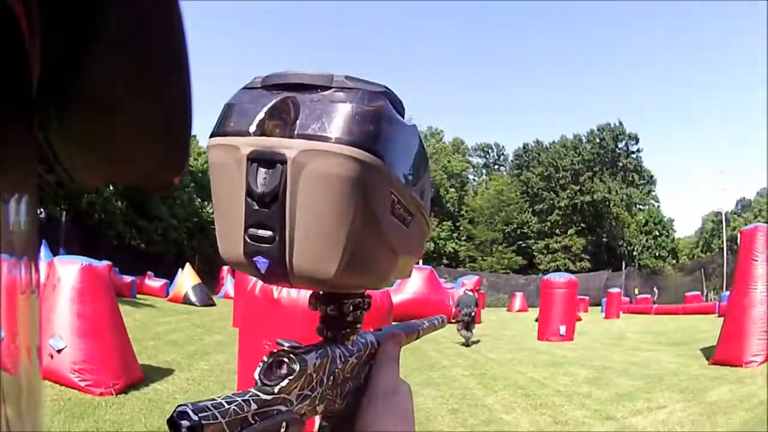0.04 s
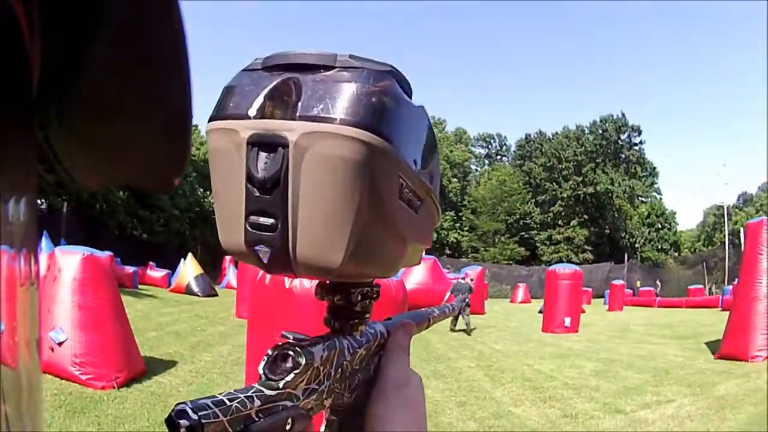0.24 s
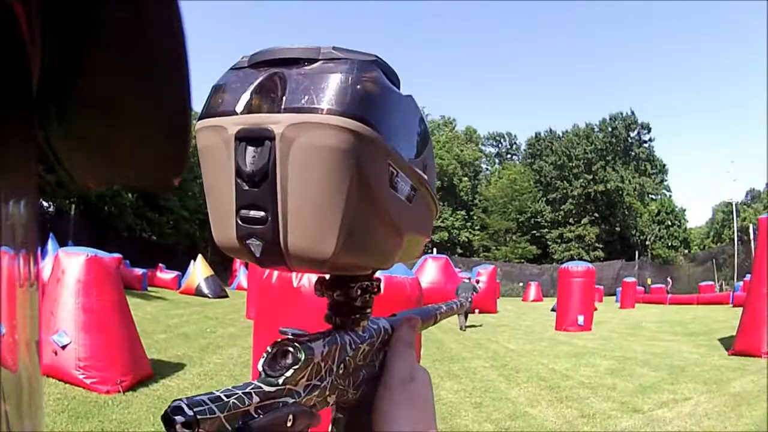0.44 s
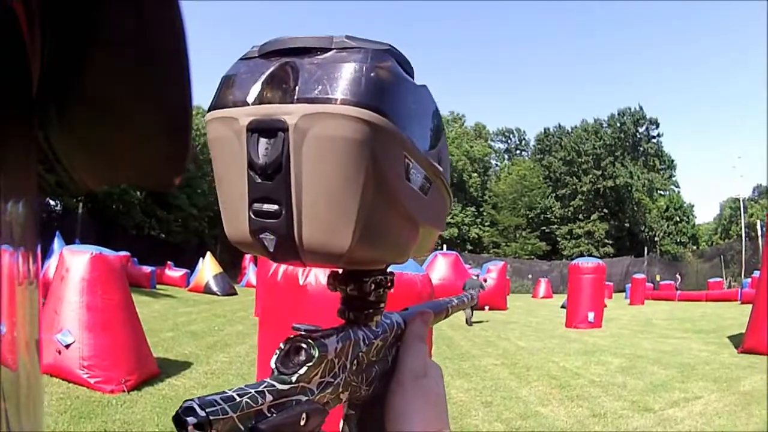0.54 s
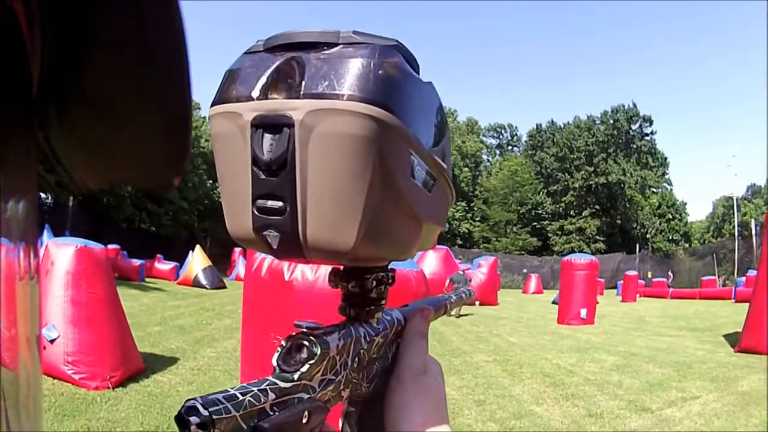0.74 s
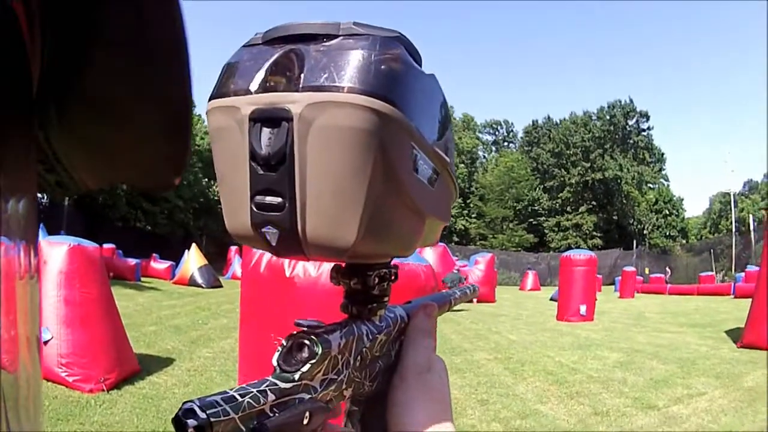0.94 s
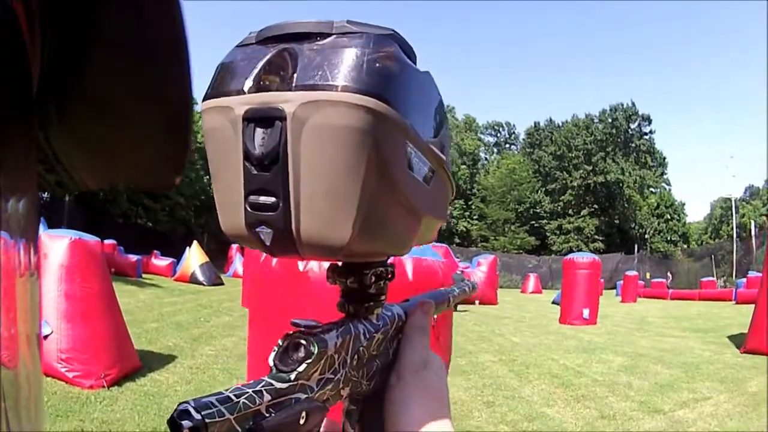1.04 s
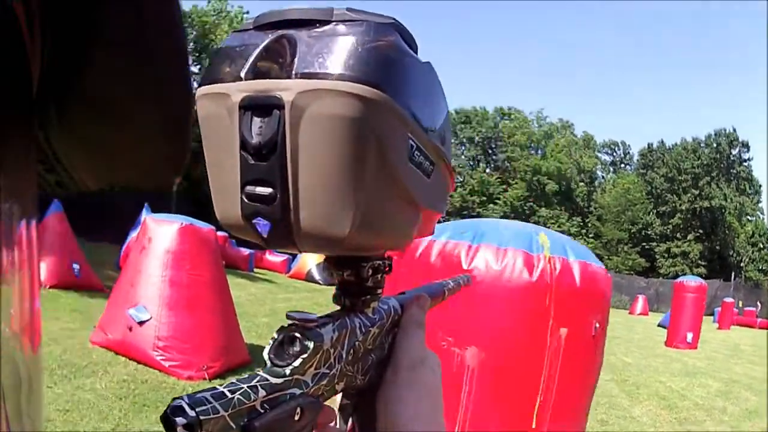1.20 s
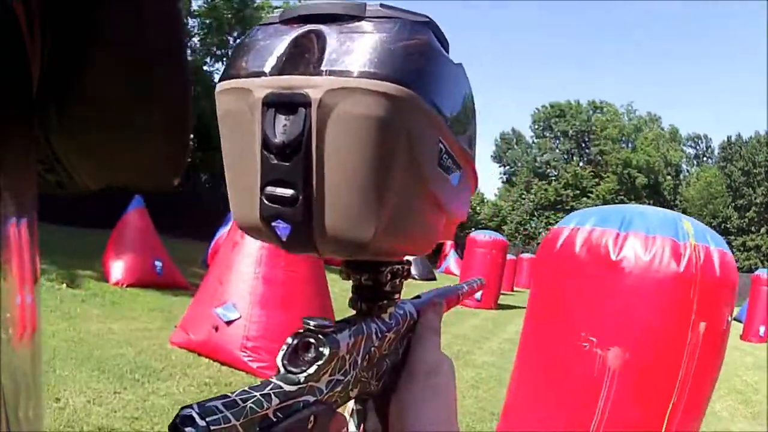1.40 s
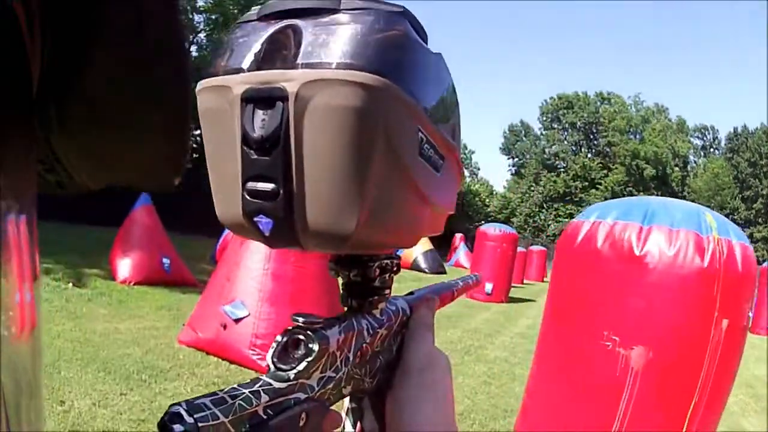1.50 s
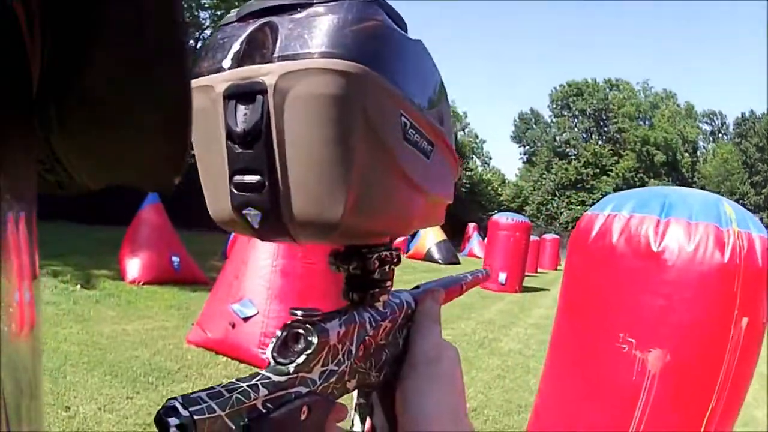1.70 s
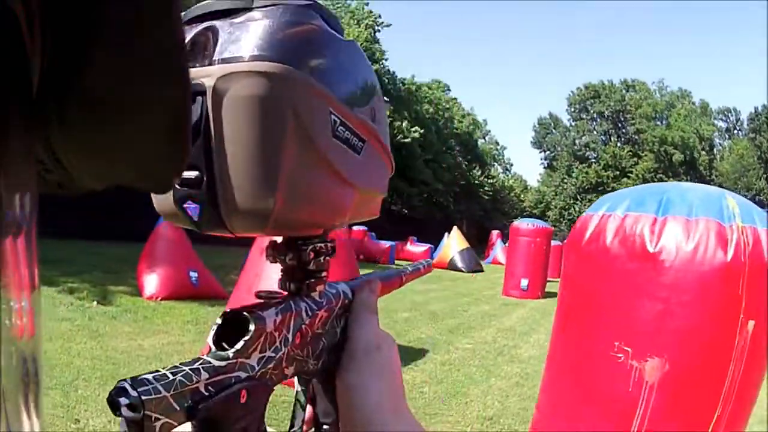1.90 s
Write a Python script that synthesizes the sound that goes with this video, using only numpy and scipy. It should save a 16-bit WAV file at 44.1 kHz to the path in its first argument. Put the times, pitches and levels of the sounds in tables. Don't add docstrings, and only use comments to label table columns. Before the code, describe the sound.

A paintball marker fires ten fast, even shots right beside a small camera microphone, loud and clipped, after a few neighbouring shots; then a ball bursts close by and distant pops and dull bunker thuds continue outdoors.

```python
import sys
import numpy as np
from scipy import signal
from scipy.fft import rfft, irfft, next_fast_len
from scipy.io import wavfile
from scipy.ndimage import uniform_filter1d

SR = 44100
rng = np.random.default_rng(int(sys.argv[2]) if len(sys.argv) > 2 else 0)


def persist_wave(psi):
    counts = np.round(np.clip(psi, -1, 1) * 32767).astype(np.int16)
    wavfile.write(sys.argv[1], SR, np.atleast_2d(counts).T)


def linear_from_db(decibels):
    return 10 ** (np.asarray(decibels, float) / 20)


N = 85995


def unit(x):
    return x / np.sqrt(np.mean(x ** 2) + 1e-20)


def filtered(x, response):
    size = next_fast_len(N + SR // 2)
    hz = np.fft.rfftfreq(size, 1 / SR)
    return irfft(rfft(x, size) * response(hz), size)[:N]


def resonant(x, peaks):
    def response(f):
        total = 0
        for k, (centre_hz, width_hz, level_db) in enumerate(peaks):
            damping = 1j * f * width_hz
            total = total + (-1) ** k * linear_from_db(level_db) * damping / (centre_hz ** 2 - f * f + damping)
        return total / np.sqrt(np.mean(np.abs(total) ** 2))
    return filtered(x, response)


def dulled(x, edge_hz):
    return filtered(x, lambda f: 1 / (1 - (f / edge_hz) ** 2 + 1.3j * f / edge_hz))


def puffs(events, parts, peaks):
    scatter_s, scatter_db = 0.00016, 1.14
    power, t = np.zeros(N), np.arange(N) / SR
    chance = rng.standard_normal((len(events), len(parts), 2))
    for (start_s, event_db), row in zip(events, chance):
        for (delay_s, part_db, rise_s, t60_s), (late, loud) in zip(parts, row):
            i = max(round((start_s + delay_s + scatter_s * late) * SR), 0)
            u = t[:min(N - i, SR // 4)]
            decay = linear_from_db(event_db + part_db + scatter_db * loud - 60 * u / t60_s)
            power[i:i + len(u)] += (decay * (1 - np.exp(-u / rise_s))) ** 2
    return resonant(np.sqrt(power) * rng.standard_normal(N), peaks)


def rings(rows, rise_s):
    out, t = np.zeros(N + SR), np.arange(SR // 4) / SR
    for start_s, pitch_hz, level_db, t60_s in rows:
        envelope = linear_from_db(level_db - 60 * t / t60_s) * (1 - np.exp(-t / rise_s))
        out[round(start_s * SR):][:len(t)] += envelope * np.sin(2 * np.pi * pitch_hz * t)
    return out[:N]


def struck(events, modes, rise_s, spread, spread_db):
    vary = rng.standard_normal((len(events), len(modes), 2))
    rows = []
    for (start_s, event_db), row in zip(events, vary):
        for (delay_s, pitch_hz, level_db, t60_s), (a, b) in zip(modes, row):
            level = event_db + level_db + spread_db * b
            rows.append((start_s + delay_s, pitch_hz * (1 + spread * a), level, t60_s))
    return rings(rows, rise_s)


def patchy_noise():
    spectrum = signal.stft(rng.standard_normal(N), nperseg=256)[2]
    patches = uniform_filter1d(rng.standard_normal(spectrum.shape), 5, 0)
    patches = unit(uniform_filter1d(patches, 6, 1))
    return signal.istft(spectrum * linear_from_db(4 * patches), nperseg=256)[1][:N]


# start_s, level_db
FIREFIGHT_LEVEL = [(0.0, -42.5), (0.292, -47.5), (0.4, -40), (0.798, -39), (1.014, -37.5), (1.346, -37.5),
                   (1.548, -41.5), (1.672, -45.5), (1.95, -45.5)]
# pitch_hz, level_db (per Hz)
FIREFIGHT_LOW = [(15, -46), (25, -7.5), (276, -11.5), (830, -9.5), (909, -13), (2000, -11), (2600, -37),
                 (4400, -120)]
# pitch_hz, width_hz, level_db
FIREFIGHT_HIGH = [(2534, 380, 2.5), (4200, 1300, -19), (6000, 1400, -36), (9200, 1040, -17)]


def far_firefight():
    times, busy_db = np.transpose(FIREFIGHT_LEVEL)
    corner_hz, corner_db = np.transpose(FIREFIGHT_LOW)

    def distance(hz):
        level_db = np.interp(np.log(hz + 1), np.log(corner_hz + 1), corner_db)
        return linear_from_db(level_db) / (1 + (hz / 2300) ** 6)
    low = unit(filtered(patchy_noise(), distance))
    high = unit(resonant(patchy_noise(), FIREFIGHT_HIGH))
    busy = linear_from_db(np.interp(np.arange(N) / SR, times, busy_db))
    return busy * (linear_from_db(-2) * low + linear_from_db(-6.5) * high)


def echoes(x):
    level_db, rise_s, t60_s, edge_hz = -24.5, 0.047, 0.52, 4550
    t = np.arange(SR // 2) / SR
    tail = rng.standard_normal(len(t)) * linear_from_db(-60 * t / t60_s) * (1 - np.exp(-t / rise_s))
    wet = signal.fftconvolve(x, tail / np.linalg.norm(tail))[:N]
    return linear_from_db(level_db) * filtered(wet, lambda hz: 1 / (1 + 1j * hz / edge_hz))


# start_s, level_db
FAR_POPS = [(.1425, -29.5), (.918, -26), (1.224, -26), (1.251, -27), (1.268, -30), (1.696, -30),
            (1.33, -15), (1.4675, -19), (1.6093, -18.5), (1.7447, -15.5), (1.8868, -17)]
# pitch_hz, level_db, t60_s
POP_TONES = [
    (2250, 4.5, 0.0065),
    (1850, -8, .005),
    (5340, -17, 0.0046),
]
# delay_s, level_db, rise_s, t60_s
POP_AIR = [
    (0, -14, 0.00042, 0.004),
    (.003, -27, 0.0025, 0.098),
]
# pitch_hz, width_hz, level_db
POP_COLOUR = [(1800, 800, -8), (2600, 710, 6)]


def far_pops():
    vary = rng.standard_normal((len(FAR_POPS), len(POP_TONES)))
    rows = []
    for (start_s, event_db), row in zip(FAR_POPS, vary):
        for (pitch_hz, level_db, t60_s), a in zip(POP_TONES, row):
            rows.append((start_s, pitch_hz * (1 + 0.032 * a), event_db + level_db, t60_s))
    return rings(rows, rise_s=0.00046) + puffs(FAR_POPS, POP_AIR, POP_COLOUR)


# start_s, level_db
RATTLES = [(.004, -50), (.066, -45), (.145, -45), (.489, -39), (1.333, -26.5), (1.346, -36), (1.355, -40),
           (1.539, -55), (1.653, -50), (1.7, -44), (1.856, -48), (1.912, -47)]
# pitch_hz, width_hz, level_db
LOADER_SHELL = [(4300, 800, 0), (5840, 740, 3), (8200, 1700, -4)]


def loader_rattles():
    knock = [(0.00073, 0, 0.0004, 0.013)]  # delay_s, level_db, rise_s, t60_s
    return puffs(RATTLES, knock, LOADER_SHELL)


# start_s, drum pitch_hz, drum
# level_db, slap level_db
BUNKER_HITS = [(.001, 181, -35.5, -45), (.169, 209, -35.5, -43), (1.3, 201, -38.5, -52),
               (1.821, 236, -33, -44), (1.43, 600, -33, -34), (.8945, 329, -20, -37),
               (1.3671, 301, -19, -36), (1.378, 284, -24, -30), (1.5176, 317, -20, -21.5),
               (1.53, 300, -30, -40), (1.6845, 200, -30, -55), (1.582, 258, -36, -41),
               (1.6784, 237, -24, -55), (1.93, 97.4, -30.5, -42)]
# pitch ratio, level_db, t60_s
SKIN_MODES = [(1.01, 2, .034), (1.61, -4.5, .025), (2.6, -5, .022), (.62, -8, .04), (.4, -16, .06)]
# delay_s, level_db, rise_s, t60_s
SLAP_AIR = [
    (0, 8.5, 0.00028, 0.0086),
    (.002, -12, 0.0034, 0.19),
]
# pitch_hz, width_hz, level_db
SLAP_COLOUR = [(810, 440, 8), (2600, 610, 1.5)]


def bunker_hits():
    drums = []
    for start_s, pitch_hz, drum_db, _ in BUNKER_HITS:
        for ratio, level_db, t60_s in SKIN_MODES:
            drums.append((start_s, pitch_hz * ratio, drum_db + level_db, t60_s))
    slap_events = [(start_s, slap_db) for start_s, _, _, slap_db in BUNKER_HITS]
    slaps = puffs(slap_events, SLAP_AIR, SLAP_COLOUR)
    return rings(drums, rise_s=0.00031) + dulled(slaps, 3400)


# delay_s, pitch_hz, level_db, t60_s
SPLAT_RING = [(.002, 420, -11, .026), (.0025, 810, -6, .03), (.0025, 1030, -6, .022),
              (.0025, 1410, -6, .026), (0, 2240, -4, .006), (0, 2580, -4, .009)]
# delay_s, level_db, rise_s, t60_s
SPLAT_AIR = [
    (0, 4.5, 0.00034, .008),
    (.003, 1, 0.0005, 0.013),
    (.003, -15.5, .003, .11),
]
# pitch_hz, width_hz, level_db
SPLAT_COLOUR = [(1160, 1100, 2), (2600, 810, 2.5), (4100, 480, -10), (6400, 4000, -18.5),
                (13000, 5700, -22)]


def ball_burst():
    start_s, burst_db = 1.3155, -6.5
    rows = []
    for delay_s, pitch_hz, level_db, t60_s in SPLAT_RING:
        rows.append((start_s + delay_s, pitch_hz, burst_db + level_db, min(t60_s, .04)))
    return rings(rows, rise_s=0.00022) + puffs([(start_s, burst_db)], SPLAT_AIR, SPLAT_COLOUR)


# delay_s, level_db, rise_s, t60_s
MUZZLE_AIR = [
    (0.00049, -3.5, 0.00036, 0.015),
    (.0055, -5, 0.00041, 0.016),
    (0.0153, -14.5, 0.0024, 0.016),
    (0.004, -18, 0.0031, .1),
]
# delay_s, level_db, rise_s, t60_s
VENT_AIR = [
    (0, -17, 0.00088, 0.018),
    (.0038, -8, .0008, 0.012),
    (.007, -21, .002, .06),
    (.014, -22, .002, .03),
]
# pitch_hz, width_hz, level_db
VENT_COLOUR = [(5250, 730, 0.5), (7080, 840, -4), (8300, 1030, -6.5), (11900, 4000, -36)]
# delay_s, pitch_hz, level_db, t60_s
REPORT_RING = [
    (.0002, 1900, -3, .004),
    (.0038, 5250, -9, 0.0073),
    (.0055, 1700, -9, .012),
]


def other_marker(shots, muzzle):
    reports = [(start_s, report_db) for start_s, report_db, _ in shots]
    vents = [(start_s, vent_db) for start_s, _, vent_db in shots]
    air = puffs(reports, MUZZLE_AIR, muzzle) + puffs(vents, VENT_AIR, VENT_COLOUR)
    metal = struck(vents, REPORT_RING, .0003, .03, 1.5)
    return dulled(air - metal, 11000)


# start_s, report level_db, vent level_db
NEIGHBOUR_SHOTS = [(.0268, -14, -16.5), (.167, -16.5, -18), (.3308, -20, -16), (.3974, -16.5, -17)]
# pitch_hz, width_hz, level_db
NEIGHBOUR_BARREL = [(455, 200, -4.5), (1600, 660, -8.5), (2680, 370, 0)]
# start_s, report level_db, vent level_db
FLANK_SHOTS = [(1.0052, -16, -15.5), (1.1005, -13, -14), (1.2022, -15, -16), (1.6628, -19, -15),
               (1.8194, -19.5, -15.5), (1.9238, -20, -16)]
# pitch_hz, width_hz, level_db
FLANK_BARREL = [(460, 200, -4), (1700, 315, 0), (2500, 390, -1.5), (4270, 320, -10)]


def other_players():
    neighbour = other_marker(NEIGHBOUR_SHOTS, NEIGHBOUR_BARREL)
    return neighbour + other_marker(FLANK_SHOTS, FLANK_BARREL)


# start_s, level_db
TRIGGER_CLICKS = [(.2198, -19), (.3045, -26), (.3284, -19), (.4412, -16), (.5316, -13.5), (.6265, -30),
                  (.6565, -17), (.8305, -13.5), (1.197, -25)]
# delay_s, level_db, rise_s, t60_s
CLICK_PARTS = [
    (0, -8.5, .0001, 0.018),
    (.004, -18, .002, .025),
]
# pitch_hz, width_hz, level_db
SWITCH_COLOUR = [(2600, 390, 3.5), (4200, 630, -0.5), (7400, 2800, -8), (10900, 4000, -21)]


def trigger():
    return puffs(TRIGGER_CLICKS, CLICK_PARTS, SWITCH_COLOUR)


# start_s, level_db
SHOTS = [(.2408, 0), (.3496, 0), (.4629, 0), (.5629, 0), (.663, 0), (.7631, -0.5), (.8632, 0), (.9633, 0),
         (1.0636, 0), (1.1635, 0.5)]
# delay_s, level_db, rise_s, t60_s
SHOT_AIR = [
    (-.0118, -22, .0004, .008),
    (0, -5, .0002, .007),
    (.0012, -5, .0006, .012),
    (.0032, -9, .0005, .014),
    (.0057, -1.5, .0004, .013),
]
# pitch_hz, width_hz, level_db
BARREL = [(772, 480, -10), (2100, 300, -2), (2700, 500, -2), (3506, 400, -2), (4300, 364, -9),
          (5340, 490, -7), (7200, 1700, -11), (9230, 950, -8), (13000, 5600, -22)]
# delay_s, level_db, rise_s, t60_s
SHOT_HISS = [
    (-.0143, -25, .002, .02),
    (-.0035, -28, .001, .02),
    (.0118, -19, .001, .02),
    (.016, -25, .001, .028),
    (.001, -34, .004, .12),
]
# pitch_hz, width_hz, level_db
BODY = [(900, 900, -6), (2090, 400, -4), (2600, 400, 0), (3510, 600, -4), (5400, 1200, -8),
        (8800, 1200, -9)]
# delay_s, pitch_hz, level_db, t60_s
SHOT_RING = [(.0003, 3270, -6, .005), (.0011, 2320, 5, .0055), (.0046, 2082, -12, .012),
             (.0058, 2075, -5, .013), (.0058, 2620, -7, .013), (.0058, 3525, -1.5, .013),
             (.0058, 5290, -5, .012), (.0058, 6970, -11, .008), (0.0123, 2600, -22, .02)]
# delay_s, pitch_hz, level_db, t60_s
SHOT_THUMP = [(-.0155, 400, -23, .011), (-.0006, 452, -15.5, .012), (.0064, 345, -5, .016),
              (.0066, 430, -14, .025), (.0062, 258, -15, .035), (.003, 118, -25, .06)]


def marker():
    blast = puffs(SHOTS, SHOT_AIR, BARREL)
    leaks = dulled(puffs(SHOTS, SHOT_HISS, BODY), 10500)
    metal = struck(SHOTS, SHOT_RING, 0.00069, 0.013, 1.45)
    thump = struck(SHOTS, SHOT_THUMP, 0.00097, 0.01, 0.98)
    return blast + leaks + metal - thump


def scene():
    distant = far_pops() + loader_rattles() + bunker_hits() + ball_burst() + other_players()
    hits = distant + trigger() + marker()
    return (far_firefight() + hits + echoes(hits))[None]


def housing(f):
    port_hz, port_width_hz, port_db = 2835, 490, 3
    notch_hz, notch_width_hz, dull_hz = 3174, 270, 10100
    port = 1j * f * port_width_hz
    lift = 1 + (linear_from_db(port_db) - 1) * port / (port_hz ** 2 - f * f + port)
    notch = 1j * f * notch_width_hz
    dip = 1 - .5 * notch / (notch_hz ** 2 - f * f + notch)
    r = f / dull_hz
    return lift * dip / (1 - r * r + 1j * r * 1.1) ** 2


def overload(x):
    ceiling, hardness = 0.49, 5.5
    return x / (1 + np.abs(x / ceiling) ** hardness) ** (1 / hardness)


def band_limits(hz):
    top_hz, roll_hz, lowcut_hz = 16400, 15500, 54.6
    treble = (hz < top_hz) / (1 + (hz / roll_hz) ** 40)
    return treble * (1j * hz / (lowcut_hz + 1j * hz)) ** 2


def band_limit(x):
    return signal.sosfilt(signal.butter(12, 16470, fs=SR, output="sos"), x)


def record(dry):
    x = overload(filtered(dry[0], housing))
    mix = filtered(x, band_limits)[None]
    return band_limit(mix)


dry = scene()
out = record(dry)
persist_wave(out)
```